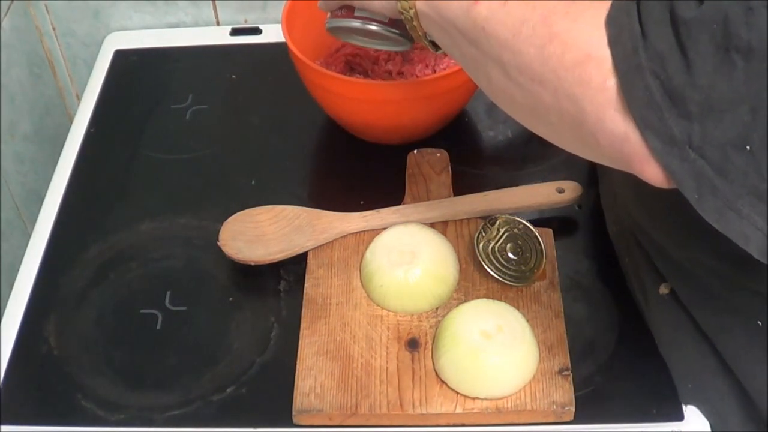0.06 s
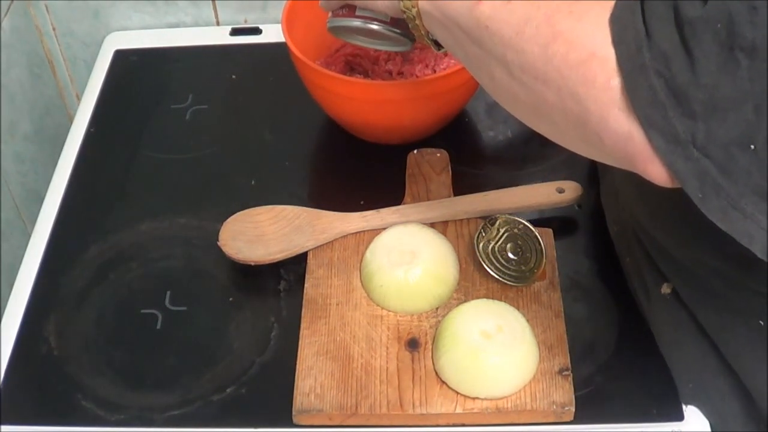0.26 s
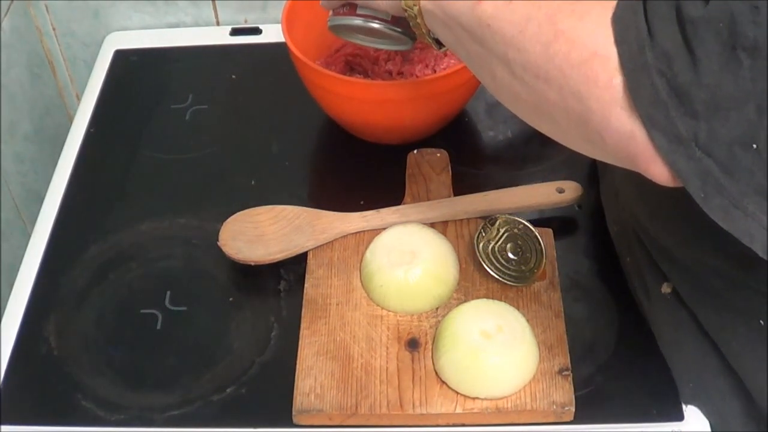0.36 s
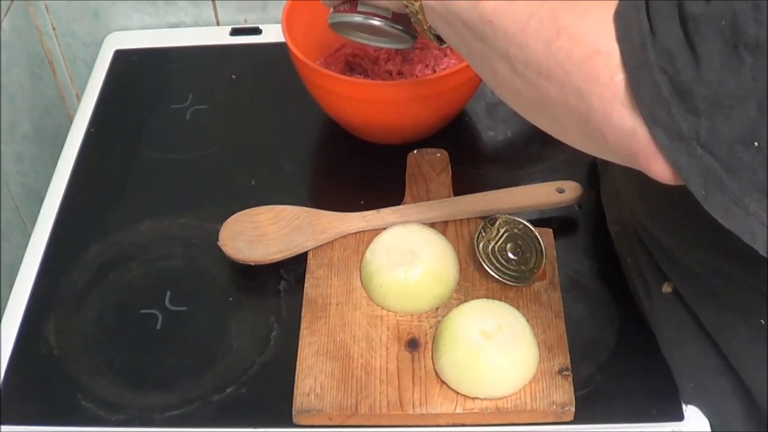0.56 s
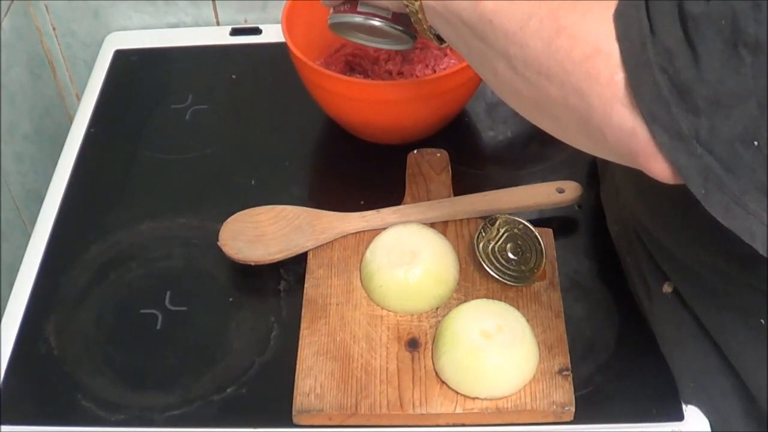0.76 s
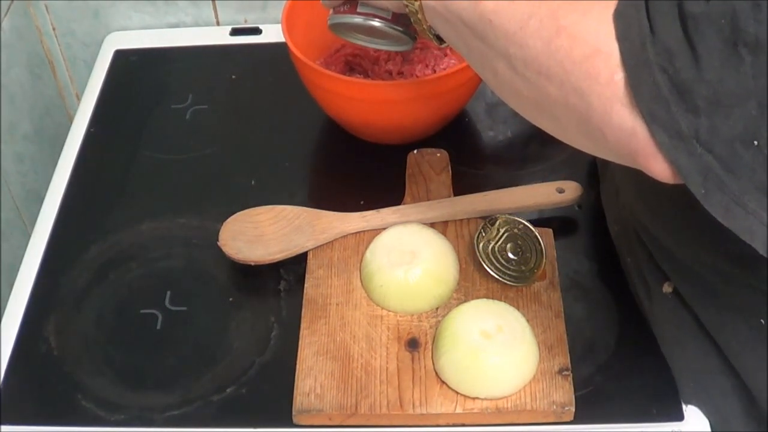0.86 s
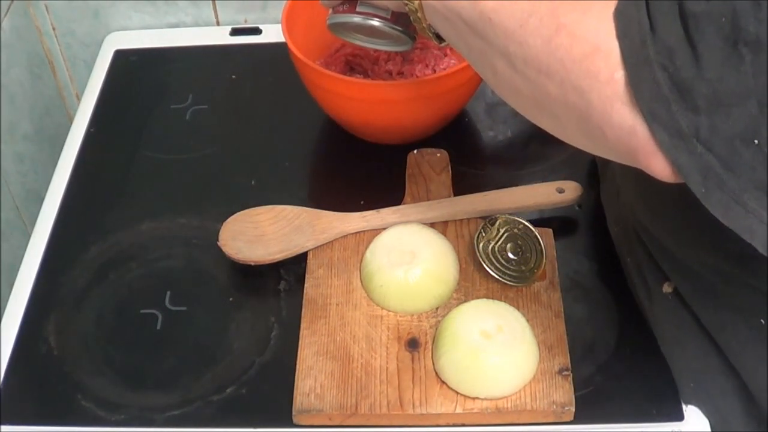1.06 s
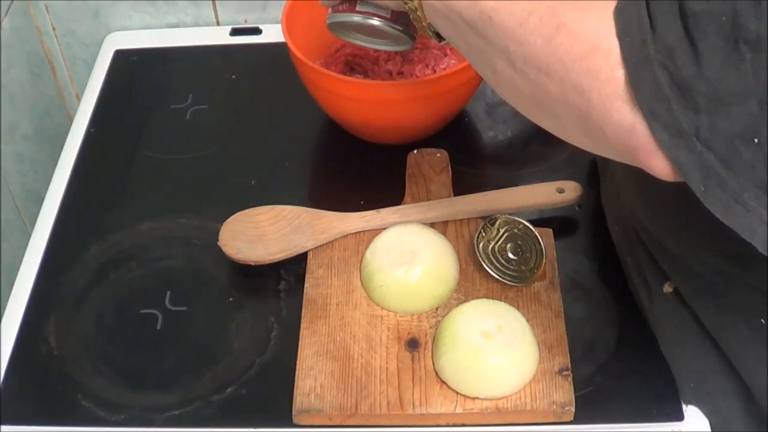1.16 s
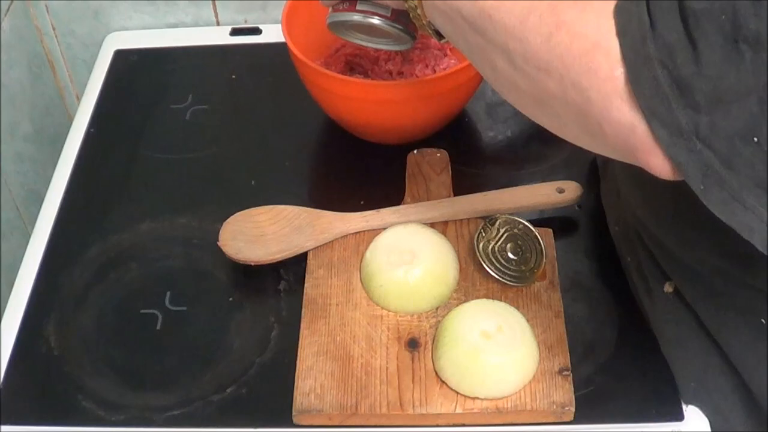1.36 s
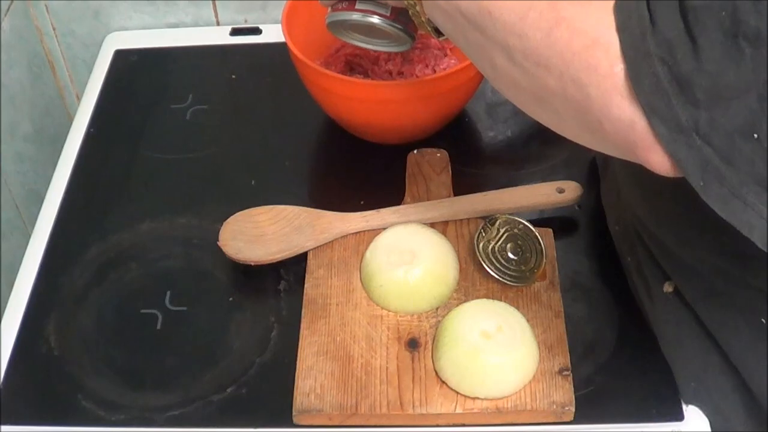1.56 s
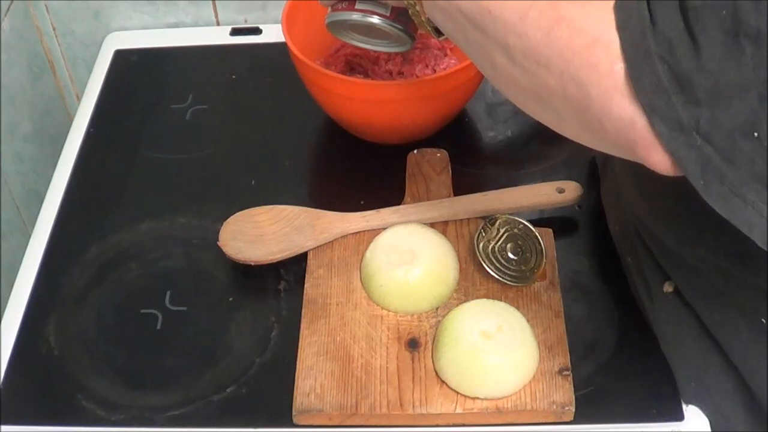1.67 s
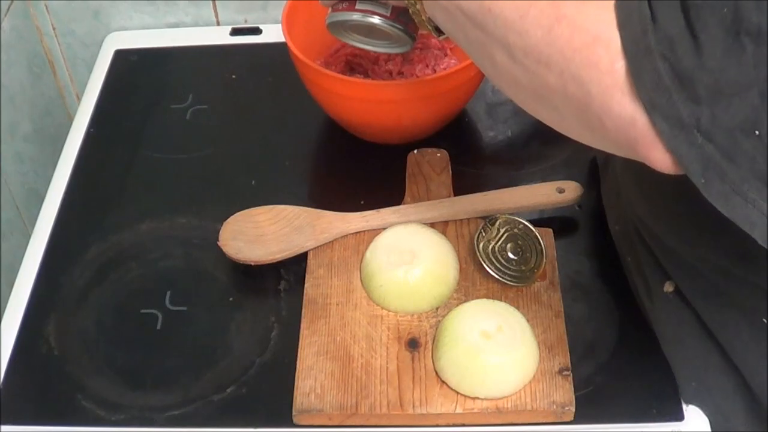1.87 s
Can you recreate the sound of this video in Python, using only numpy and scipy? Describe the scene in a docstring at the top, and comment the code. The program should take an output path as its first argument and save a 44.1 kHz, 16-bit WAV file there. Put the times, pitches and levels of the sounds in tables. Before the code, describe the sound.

Thick soup slides out of a tin onto mince in a plastic bowl, heard close. Fine bubbly fizz and tiny wet ticks quicken from 0 to 0.35 s; a loud hollow plop with a bright smack lands at 0.4, another at 0.53. Sharp ticks at 0.68, a plop at 0.8, a faint one at 0.94, a wet blob at 1.33, then near quiet. Short kitchen ring, soft hiss, faint high whine, dull rustle rising at the end.

```python
"""Thick soup slides out of a tin onto mince in a plastic bowl, close by in a small kitchen.
Air pockets plop or tick as swelling, dying sine tones; wet films smack as short volleys of filtered clicks.
A fizz of countless tiny bubbles runs beneath, and the pour thins to single blobs.
Early echoes, ringing resonances and a diffuse tail answer from bowl, worktop and walls.
Shaped noise gives the room hiss and a soft rustle; a steady sine gives a thin electrical whine."""
import sys
import numpy as np
from scipy import signal
from scipy.fft import rfft, irfft, next_fast_len
from scipy.io import wavfile

SR = 44100
rng = np.random.default_rng(int(sys.argv[2]) if len(sys.argv) > 2 else 0)


def log_audio(samples):
    """Write samples as a 16-bit WAV file to the path given in sys.argv[1]."""
    # one column per channel
    frames = np.atleast_2d(samples).T
    # limit to full scale, then quantise
    limited = np.clip(frames, -1, 1)
    pcm = np.round(limited * 32767).astype(np.int16)
    wavfile.write(sys.argv[1], SR, pcm)


N = 83790  # length in samples, 1.9 s
TOP_HZ = 15950  # upper band limit


def amp(db):
    """Decibels to gain."""
    return 10 ** (np.asarray(db) / 20)


def unit(x):
    """Scale to rms 1."""
    return x / np.sqrt(np.mean(x ** 2) + 1e-20)


def along(points, hz):
    """Interpolate (frequency, value) points on a log frequency axis."""
    f, v = np.transpose(points)
    return np.interp(np.log(hz + 1), np.log(f + 1), v)


def level(points):
    """Gain per sample from (time [s], level [dB]) points."""
    times, levels = np.transpose(points)
    return amp(np.interp(np.arange(N) / SR, times, levels))


def filtered(x, response):
    """Shape the spectrum of x by a response, a function of frequency in Hz."""
    m = next_fast_len(N + SR // 2)  # room for ringing past the end
    spectrum = rfft(x, m) * response(np.fft.rfftfreq(m, 1 / SR))
    return irfft(spectrum, m)[..., :x.shape[-1]]


def add(track, s, sound):
    """Mix a sound into the track at time s, cut off at the track's end."""
    part = track[max(round(s * SR), 0):][:len(sound)]
    part += sound[:len(part)]


def stereo(mid, side):
    """Left and right from mid and side."""
    return np.array([mid + side, mid - side])


# Stereo width of the background noise: (frequency [Hz], side gain relative to mid [dB])
NOISE_WIDTH = [(60, -13.5), (150, -6), (380, 1), (950, 3.5), (2380, 0), (5980, 1.5), (15000, -28.5)]


def air(colour):
    """Coloured stereo noise of rms 1, near mono in the bass and the extreme treble."""
    mid, side = filtered(rng.standard_normal((2, N)), lambda f: amp(along(colour, f)))
    side = filtered(side, lambda f: amp(along(NOISE_WIDTH, f)))
    return unit(stereo(mid, side))


# Colour of the room hiss: (frequency [Hz], relative density [dB per Hz])
HISS_COLOUR = [(15, -32), (25, -12.5), (43, -3.5), (212, 0), (416, -4), (641, -4.5), (988, -12.5),
               (1100, -3.5), (1400, -16), (1740, -9.5), (5730, -17), (10100, -15), (14800, -18),
               (16000, -11.5)]
HISS_DB = -44


def room_hiss():
    """Steady room noise, strongest in the bass."""
    return amp(HISS_DB) * air(HISS_COLOUR)


# Swell of the soft rustle: (time [s], level [dB])
RUSTLE_LEVEL = [(0, -46), (.6, -59.5), (1.4, -54.5), (1.7, -45.5), (1.9, -41.5)]
# Colour of the soft rustle: (frequency [Hz], relative level [dB])
RUSTLE_COLOUR = [(60, 0), (180, -8.5), (700, -7), (2000, -8), (5000, -25), (15000, -22)]


def rustle():
    """A soft, dull noise that dips and swells."""
    return level(RUSTLE_LEVEL) * air(RUSTLE_COLOUR)


WHINE_HZ, WHINE_DB = 15625, -53  # level is rms


def electrical_whine():
    """A steady sine, equal in both ears."""
    sine = np.sin(2 * np.pi * WHINE_HZ * np.arange(N) / SR)
    return amp(WHINE_DB) * np.sqrt(2) * sine


# Early echoes off bowl, worktop and walls: (delay [ms])
ECHO_DELAY = [4.31, 7.78, 12.28, 19.71, 24.22, 28.71, 32.98]
# Strength of each of those echoes, in the same order: (level [dB])
ECHO_LEVEL = [-4, -1.5, -4.5, -3.5, -14, -12.5, -7.5]
ECHO_DULL_HZ = 2950


def early_echoes(f):
    """Response of the early echoes: pure delays that lose their treble."""
    echoes = 0
    for ms, db in zip(ECHO_DELAY, ECHO_LEVEL):
        echoes = echoes + amp(db) * np.exp(-2j * np.pi * f * ms / 1000)
    return echoes / (1 + (f / ECHO_DULL_HZ) ** 2)


# Resonances of the space around the bowl: (pitch [Hz])
HOLLOW_PITCH = [861, 908, 981, 1110, 1157, 1224, 1268, 1303, 1356, 1410, 1568]
# Ring of each of those resonances, in the same order: (peak gain [dB], time to fall 60 dB [s])
HOLLOW_DECAY = [(4, 0.29), (11.5, 0.5), (10, 0.44), (12, 0.26), (8.5, 0.18), (10.5, 0.29), (-23, 0.6),
                (-0.5, 0.14), (20, 0.26), (10.5, 0.27), (12.5, 0.067)]


def hollow(f):
    """Response of the damped resonances that keep each plop ringing."""
    total = 0
    for hz, (db, t60) in zip(HOLLOW_PITCH, HOLLOW_DECAY):
        loss = 1j * f * np.log(1000) / np.pi / t60
        total = total + amp(db) * loss / (hz * hz - f * f + loss)
    return total


# Decay of the diffuse tail: (frequency [Hz], time to fall 60 dB [s])
TAIL_DECAY = [(300, 0.9), (1200, 0.34), (4000, .23), (9000, 0.22), (15000, 0.22)]


def diffuse(sound):
    """The sound's short room tail as mid and side: decaying noise whose treble dies first."""
    hz, t, z = signal.stft(rng.standard_normal((2, SR // 4)), SR, nperseg=256)
    decay = amp(-60 * t / along(TAIL_DECAY, hz)[:, None])
    _, tail = signal.istft(z * decay, SR, nperseg=256)
    tail = tail / np.linalg.norm(tail[0])  # unit energy in the mid
    return signal.fftconvolve(sound[None], tail, axes=1)


# Colour of the diffuse tail: (frequency [Hz], gain [dB])
TAIL_TONE = [(300, -20), (1100, -3), (1500, 4.5), (2500, -2.5), (8000, 1), (15000, -1)]
# Stereo width of the diffuse tail: (frequency [Hz], side gain relative to mid [dB])
TAIL_WIDTH = [(300, -1), (1100, -6.5), (2500, -5.5), (8000, -5.5), (14000, -13)]


def kitchen(events):
    """Direct sound, near echoes, ringing resonances and a diffuse tail for each (s, sound)."""
    direct, mid, side = np.zeros((3, N))
    for s, sound in events:
        tail_mid, tail_side = diffuse(sound)  # a fresh tail for every event
        add(direct, s, sound)
        add(mid, s, tail_mid)
        add(side, s, tail_side)
    near = filtered(direct, lambda f: 1 + early_echoes(f) + hollow(f))
    mid = filtered(mid, lambda f: amp(along(TAIL_TONE, f)))
    side = filtered(side, lambda f: amp(along(TAIL_TONE, f) + along(TAIL_WIDTH, f)))
    return stereo(near + mid, side)


RISE_SHARE = 0.0067  # share of its pitch a bubble gains per swell time


def bubble(hz, cycles):
    """A pocket of air swells for the given cycles and dies away, its pitch rising slightly."""
    t = np.arange(int(10 * cycles / hz * SR) + 2) / SR
    u = t * hz / cycles  # time in swells: loudest at 1
    swell = u * np.exp(1 - u)
    return swell * np.sin(2 * np.pi * hz * t * (1 + RISE_SHARE * (u / 2 - 1)))


# Fizz of the sliding soup before the room answers: (time [s], level [dB])
FIZZ_LEVEL = [(0, -50.5), (.15, -48), (.33, -54), (.49, -48), (.6, -59), (.8, -58), (1.2, -59.5),
              (1.6, -59), (1.9, -54)]
FIZZ_PER_S, FIZZ_CYCLES = 1600, 1.54
FIZZ_HZ, FIZZ_LOW_HZ, FIZZ_SPREAD = 5930, 2460, 0.466  # median pitch, lowest pitch, scatter exponent
FIZZ_SCATTER_DB = 2  # scale of the random boost per bubble


def fizz():
    """Countless tiny bubbles of scattered pitch and strength burst as the soup slides."""
    out = np.zeros(N)
    for when, a, b in rng.random((int(FIZZ_PER_S * N / SR), 3)):
        hz = FIZZ_HZ * (a / (1 - a)) ** (FIZZ_SPREAD / 2)
        hz = np.clip(hz, FIZZ_LOW_HZ, TOP_HZ)
        boost_db = -FIZZ_SCATTER_DB * np.log(max(b, .02))  # most are soft, a few stand out
        add(out, when * N / SR, amp(boost_db) * bubble(hz, FIZZ_CYCLES))
    return unit(out) * level(FIZZ_LEVEL)


SMACK_RISE_MS, SPIKY = 0.38, 0.6  # onset time, unevenness of the clicks


def crackle(length_ms, hz, octaves):
    """A brief volley of uneven clicks in one band, with a fast onset and exponential decay."""
    ms = np.arange(SR // 20) / SR * 1000
    shape = (1 - np.exp(-ms / SMACK_RISE_MS)) * np.exp(-ms / length_ms)
    sign, size = rng.standard_normal((2, len(ms)))
    clicks = shape * sign * np.exp(SPIKY * size)
    edges = hz * 2 ** (np.array([-.5, .5]) * octaves)
    edges = np.minimum(edges, [SR / 3, SR / 2 - 1000])  # stay below half the sample rate
    band = signal.butter(2, edges, 'band', fs=SR, output='sos')
    burst = signal.sosfilt(band, clicks)
    # same energy as the envelope scaled to peak 1
    return burst * np.linalg.norm(shape / shape.max()) / np.linalg.norm(burst)


# Wet films tearing: (time [s], decay length [ms], spray level [dB], spray centre [Hz],
# spray width [octaves], squelch level [dB])
FILM_TEARS = [(.159, 2.4, -38, 8000, 1.2, -35), (0.177, 2, -30.5, 9300, 0.37, -32.5),
              (0.2471, 4.9, -21, 8040, 0.83, -28.5), (.3388, 2.8, -17.5, 7100, .6, -23.5),
              (.357, 2.4, -27, 6400, 1.05, -30), (0.3969, 4, -23, 9700, 1.1, -41),
              (0.4044, 2.66, -10.5, 8820, 0.64, -34), (0.453, 13, -51, 6000, 1.5, -40.5),
              (.484, 4.6, -53, 5900, 1, -38.5), (.514, 2, -51, 8000, 1, -49),
              (0.531, 4.4, -24, 7820, 0.43, -29), (.6835, 1.8, -26.5, 9610, 0.75, -66),
              (.756, 1.7, -33.5, 9600, 0.54, -43), (0.805, 2.3, -37.5, 8200, 1.8, -40),
              (.887, 2.6, -41.5, 10400, 0.25, -71), (1.029, 24, -52.5, 8200, 0.34, -51),
              (1.2545, 2, -41.5, 11100, .5, -66), (1.286, 2, -40, 7850, 1.2, -51),
              (1.3283, 3.9, -24, 8100, 0.84, -29), (1.5506, 3.2, -40.5, 8850, 0.58, -49),
              (1.574, 2.4, -40, 9200, .7, -50), (1.681, 1.9, -41, 9100, .5, -58),
              (1.783, 3.5, -33.5, 5830, 1.2, -35)]
SHEEN_DB, SHEEN_HZ, SHEEN_OCTAVES = -12.5, 13000, .45  # airy top, level relative to the spray
SQUELCH_HZ, SQUELCH_OCTAVES = 3110, 1.47


def smacks():
    """Each tearing film gives a bright spray with an airy top, and a duller squelch: a list of (s, sound)."""
    out = []
    for s, ms, spray_db, hz, octaves, squelch_db in FILM_TEARS:
        sheen = amp(SHEEN_DB) * crackle(ms, SHEEN_HZ, SHEEN_OCTAVES)
        spray = amp(spray_db) * (crackle(ms, hz, octaves) + sheen)
        squelch = amp(squelch_db) * crackle(ms, SQUELCH_HZ, SQUELCH_OCTAVES)
        out.append((s, spray + squelch))
    return out


# Air pockets opening, before the low cut: (time [s], pitch [Hz], peak level [dB], swell [cycles])
AIR_POCKETS = [(.051, 7780, -35, 18), (0.077, 3210, -30.5, 2.7), (.077, 4730, -37, 8.4),
               (.1255, 6540, -39, 11), (.152, 2280, -36, 2.8), (0.178, 3514, -25.5, 6.6),
               (0.2312, 4610, -24.5, 5.5), (0.235, 2770, -29.5, 3.3), (.2478, 8670, -21, 7.1),
               (0.246, 5634, -26, 8.6), (0.2693, 1030, -18.5, 1.26), (.339, 2114, -25, 10.6),
               (.339, 940, -25.5, 1.35), (.3392, 3600, -24.5, 6.3), (0.346, 1240, -36, 3),
               (.361, 910, -25, 1.64), (0.405, 1017, -9, 1.41), (.428, 868, -22, 2.1),
               (0.4504, 2492, -35.5, 7.1), (.4754, 2150, -33, 5.9), (0.487, 2740, -25.5, 3.5),
               (0.4918, 3060, -25.5, 1.9), (0.5308, 1260, -15.5, 1.74), (0.6827, 8970, -20, 12),
               (0.685, 9900, -18.5, 6), (0.757, 1280, -39.5, 2.3), (.757, 7810, -32.5, 13),
               (.8060, 1155, -19.5, 2.05), (0.9422, 1202, -24.5, 2.1), (1.286, 9750, -34, 15),
               (1.3300, 1254, -18, 3.95), (1.332, 2210, -32, 3.2)]
PLOP_LOW_HZ = 755  # a small opening radiates little below this


def plops():
    """Large pockets plop, small ones tick, each a swelling bubble tone: a list of (s, sound)."""
    low_cut = signal.butter(4, PLOP_LOW_HZ, 'high', fs=SR, output='sos')
    out = []
    for s, hz, db, cycles in AIR_POCKETS:
        out.append((s, amp(db) * signal.sosfilt(low_cut, bubble(hz, cycles))))
    return out


def scene():
    """The pour in the kitchen over the quiet room."""
    background = room_hiss() + rustle() + electrical_whine()
    pour = [(0.0027, fizz())] + smacks() + plops()
    return background + kitchen(pour)


def record(dry):
    """A steep cut: nothing above the band limit passes."""
    return filtered(dry, lambda hz: hz < TOP_HZ)


dry = scene()
out = record(dry)
log_audio(out)
```